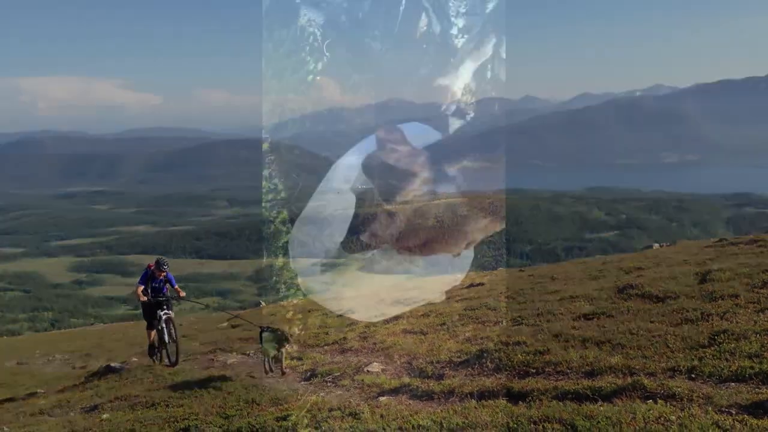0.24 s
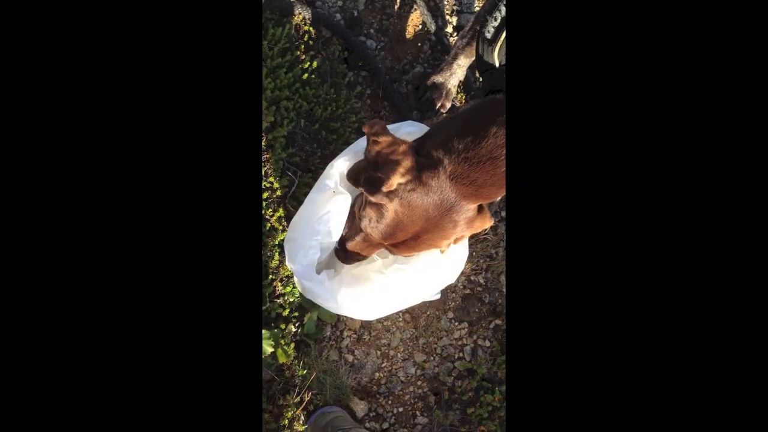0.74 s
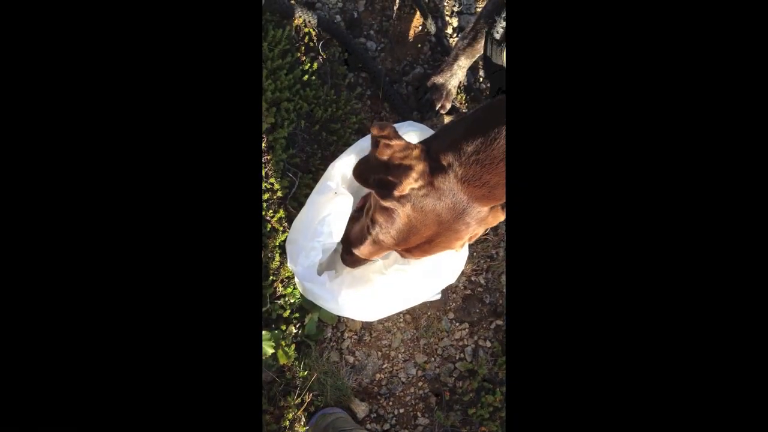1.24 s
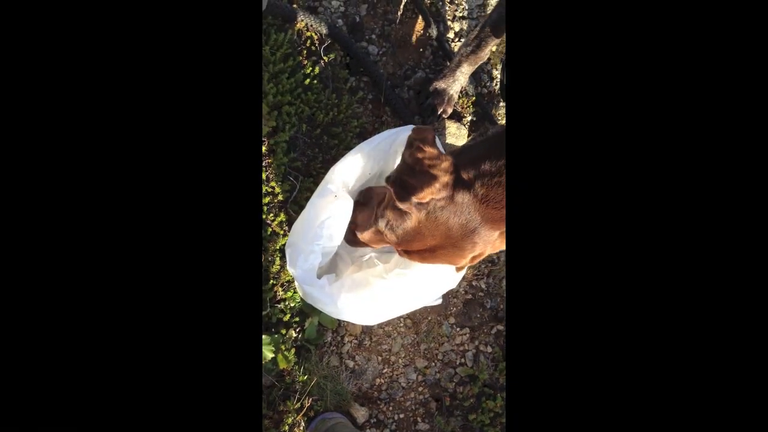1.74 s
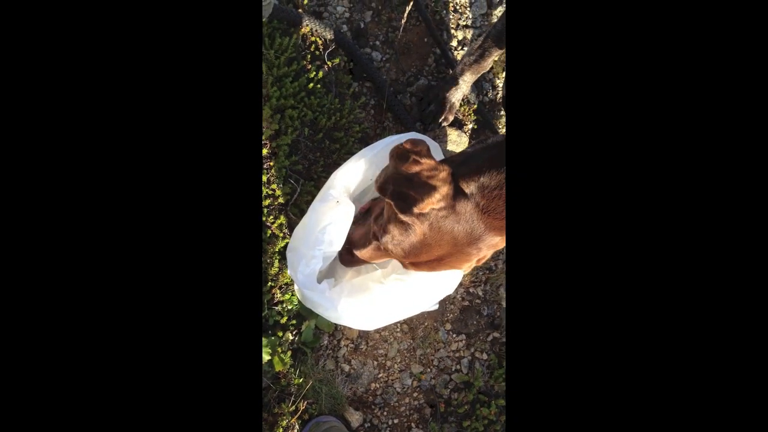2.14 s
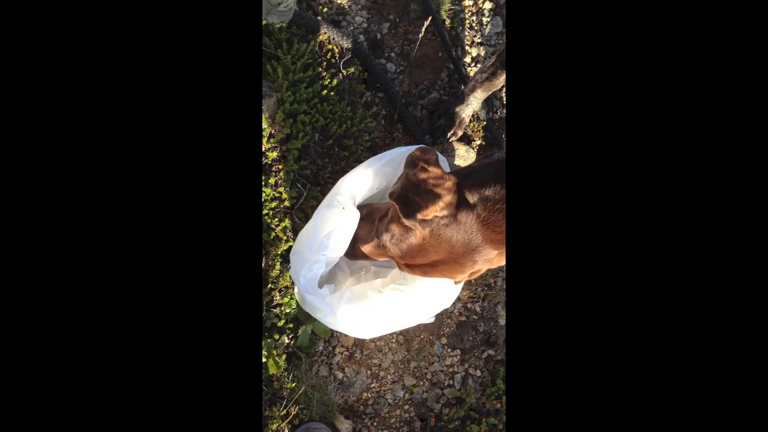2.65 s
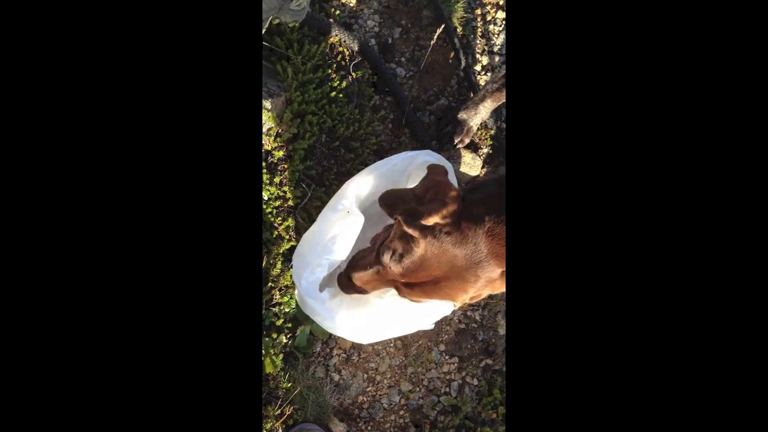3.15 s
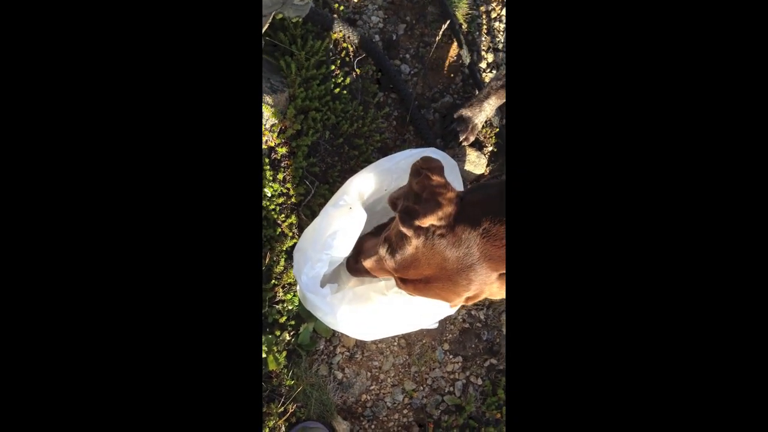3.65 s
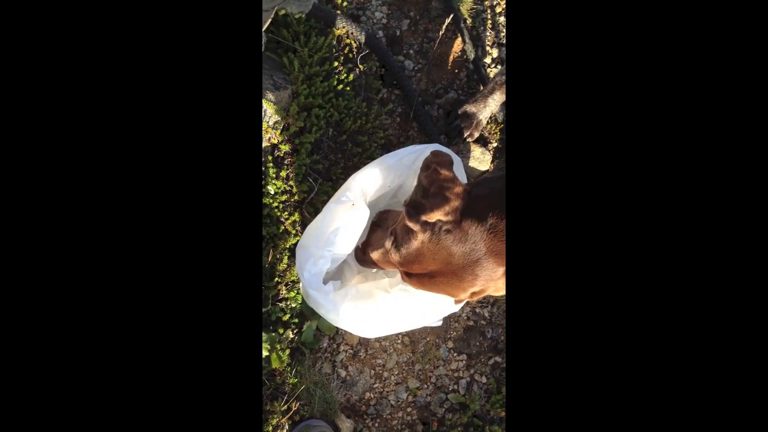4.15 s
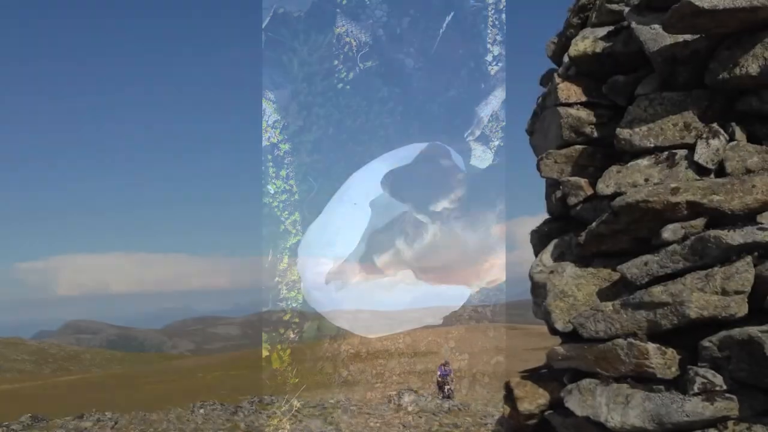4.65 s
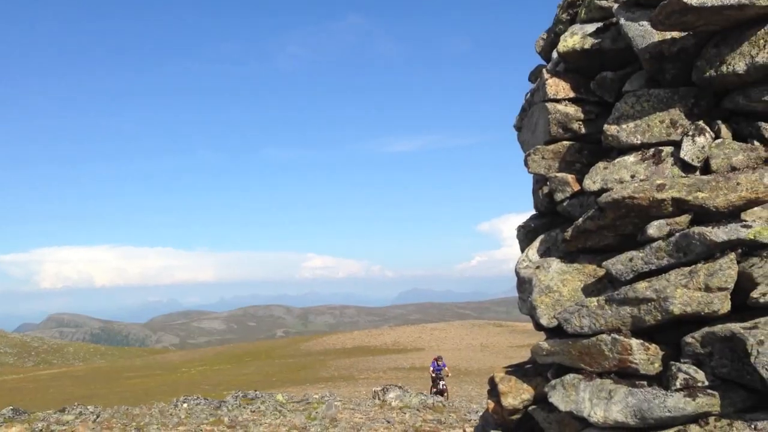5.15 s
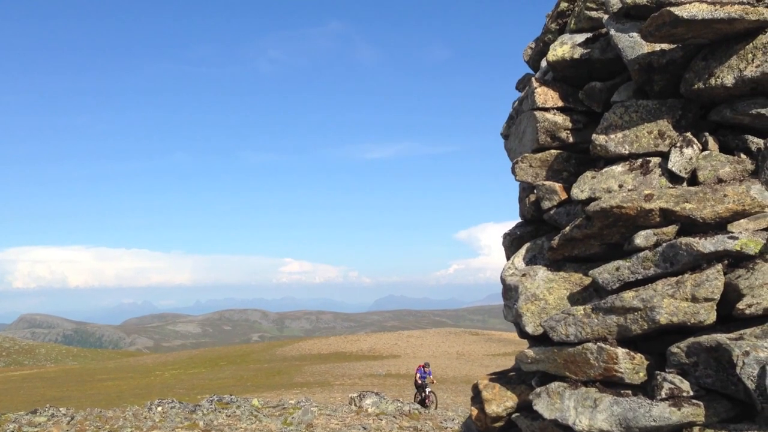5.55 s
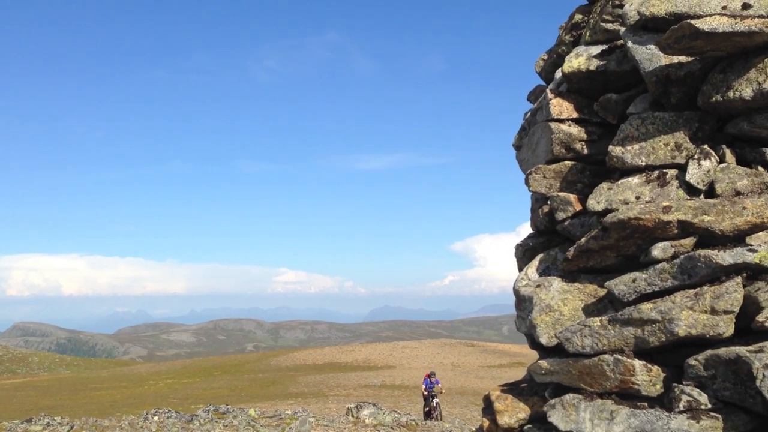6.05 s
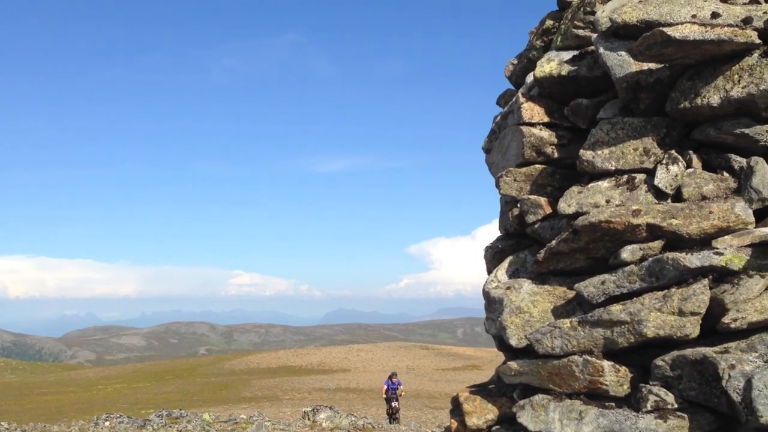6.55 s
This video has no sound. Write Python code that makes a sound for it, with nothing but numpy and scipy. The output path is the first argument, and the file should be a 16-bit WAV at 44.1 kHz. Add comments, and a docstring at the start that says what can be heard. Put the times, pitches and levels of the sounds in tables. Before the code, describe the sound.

Close, rhythmic slurps and splashes of a dog drinking outdoors fade out into quiet air and one small tick.

```python
"""Open ground, a small microphone close to a dog drinking from a plastic bag. Over a faint hiss, water
trickles and the lapping starts, about three laps a second. In each lap the tongue slaps the water and
pulls a column out, then the jaws snap shut with a plop: trapped air rings, water films tear, and
droplets splatter back. Stones and ground nearby return a brief scatter. Near five seconds the lapping
fades out, leaving the hiss, a few faint scuffs and one small tick."""
import sys
import numpy as np
from scipy import signal
from scipy.fft import rfft, irfft, next_fast_len
from scipy.io import wavfile

SR = 44100
rng = np.random.default_rng(int(sys.argv[2]) if len(sys.argv) > 2 else 0)


def store_wav(level_fs):
    """Save 16-bit WAV to argv[1]."""
    pcm = np.round(np.clip(np.atleast_2d(level_fs), -1, 1) * 32767)
    wavfile.write(sys.argv[1], SR, pcm.T.astype(np.int16))


N = 300497
TIME = np.arange(N) / SR
CUTOFF_HZ = 15600

# the hiss of the open air, its colour: f/Hz, density/dB; its course: t/s, level/dB
AIR_COLOUR = [(18, -47.5), (30, -20), (80, -13.5), (148, -5), (192, -2), (230, -7.5), (299, -7), (410, -7),
              (505, -9.5), (709, -14), (787, -13.5), (1110, -16.5), (1360, -18), (1680, -17.5),
              (4780, -13.5), (15500, -17)]
AIR_LEVEL = [(0, -68.5), (.5, -66.5), (4.3, -68), (4.65, -71.5), (5.0, -68), (6.8, -68.5)]
# the trickle between laps: t/s, level/dB
DRIBBLE_LEVEL = [(0.0, -65.5), (0.25, -68.5), (0.5, -66), (0.63, -62), (2.26, -62.5), (2.34, -65),
                 (2.69, -67.5), (2.78, -65.5), (3.27, -69), (3.35, -65), (4.22, -69), (4.34, -63.5),
                 (4.48, -71), (4.95, -78.5)]
# uneven swells of soft, bright rustle between laps, probably the bag: t/s, level/dB
RUSTLE_LEVEL = [(0, -80), (.55, -77), (.72, -68.5), (1.0, -70), (1.28, -75), (1.52, -64.5), (1.7, -68.5),
                (1.86, -69), (2.02, -60), (2.12, -68), (2.18, -78), (2.26, -66), (2.4, -68), (2.5, -85),
                (4.9, -87)]
# colours of large, middling and fine bubbles, of foam and of stray pings: f/Hz, density/dB
SLOSH_COLOUR = [(130, -21), (200, -6.5), (310, -4.5), (450, 2.5), (620, -5), (900, -2), (1250, -16.5),
                (1800, -38)]
TRICKLE_COLOUR = [(800, -19), (1250, -4), (1700, 0), (2200, 0.5), (2900, -7.5), (3800, -33.5)]
SPRAY_COLOUR = [(2300, -21.5), (3200, -1.5), (4000, 4.5), (4900, -1.5), (6000, -6), (7500, -11),
                (10000, -13.5), (15000, -15)]
FOAM_COLOUR = [(5400, -5.5), (6400, -4.5), (7500, 0), (8700, -5), (10000, -9.5), (11500, -14.5),
               (15000, -16)]
PING_COLOUR = [(3400, 0), (5200, -3)]
# the splash around each beat, and the swish of the wet tongue through a whole lap:
# rise/s, hold/s, fall/s, slosh/dB, trickle/dB, spray/dB, foam/dB
SLAP_SPLASH = (.019, 0.0143, .023, -48.5, -54, -55.5, -70)
PULL_SPLASH = (.013, 0.0127, .022, -48.5, -64.5, -53.5, -63.5)
SNAP_SPLASH = (.005, 0.0175, .017, -52, -67, -57, -79)
TONGUE_SWISH = (.016, 0.13, .018, -59, -65, -61.5, -68)
# first beat, the tongue slaps the water and traps an air pocket: t/s, pocket f/Hz, pocket/dB,
# pocket t60/s, smack/dB, treble/dB, thud/dB, first touch lead/s, touch/dB re slap, slosh/dB, spray/dB
SLAPS = [(0.2961, 600, -36.5, 0.0076, -50, -56, -59, .011, -2.5, -13, -2),
         (0.4755, 600, -36, .012, -38, -54, -57, .012, -3.5, -2.5, -0.5),
         (0.8056, 477, -19.5, 0.041, -20, -34.5, -42, .011, -13.5, 2.5, 0),
         (1.0765, 417, -18, 0.019, -19.5, -35, -25.5, .01, -21, 4.5, 4),
         (1.3741, 450, -20.5, 0.021, -22.5, -42.5, -34, .01, -20, -3, -1.5),
         (1.7261, 453, -15, .016, -24.5, -41.5, -31, .009, -20, -7, -1.5),
         (2.0263, 570, -34, .018, -45, -59, -55, .02, -9, 2.5, 0),
         (2.2772, 575, -38, .035, -44, -61, -58, .01, -20, -5, -3.5),
         (2.6495, 515, -22, 0.025, -41.5, -45.5, -46, .009, -11.5, -4.5, 1),
         (2.907, 810, -28.5, .011, -36.5, -47, -54, .01, -19, -1.5, 1),
         (3.2024, 474, -19, 0.014, -25.5, -37, -43, .008, -6, 0.5, 2.5),
         (3.4877, 564, -34.5, 0.055, -39, -56, -37, .01, -5, 3, 0.5),
         (3.8383, 577, -36.5, 0.052, -43.5, -58, -43.5, .01, -20, -6.5, -4),
         (4.1325, 587, -20.5, 0.03, -30, -55, -56, .013, -4, 2.5, -1),
         (4.4294, 503, -20, .018, -27, -41, -39, .007, -1.5, -1.5, -0.5),
         (4.7834, 524, -35.5, .015, -52, -60, -58, .01, -14, -11, -9.5)]
# second beat, about 75 ms on, the tongue pulls out and its water column collapses:
# t/s, pocket f/Hz, pocket/dB, ping/dB, smack/dB, treble/dB, thud/dB, slosh/dB, spray/dB
PULLS = [(0.5415, 756, -35, -46, -52, -51, -40.5, -2, 0), (0.8745, 633, -33.5, -33.5, -50, -45, -38, 1, -2),
         (1.158, 567, -27.5, -46, -48, -52, -50, -1.5, -5), (1.4442, 684, -30, -34, -45, -46, -45, 0, -2),
         (1.797, 350, -20, -43, -51, -43, -26, -2, -2), (2.0836, 540, -42, -40, -46, -52, -49, 1.5, 1),
         (2.354, 360, -28, -43, -43, -44.5, -47, 0.5, 1),
         (2.7295, 480, -31.5, -33.5, -38.5, -47, -50, 1.5, 2), (2.981, 610, -38, -29, -41, -44, -42, 0, -2),
         (3.266, 405, -19.5, -42, -48, -48, -39, -1, -5), (3.559, 820, -34.5, -44, -44, -39, -58, -3, -4),
         (3.9165, 620, -31.5, -40.5, -53, -38.5, -54, -3, -3),
         (4.1995, 668, -33, -39, -50, -41, -37, -1.5, 0),
         (4.5053, 764, -30, -42.5, -54, -52, -48, 1.5, 0.5),
         (4.8005, 450, -50, -52, -40.5, -44, -52, -10, -12)]
# third beat, about 40 ms on, the jaws snap shut: t/s, f/Hz, plop/dB, smack/dB, treble/dB, splash/dB
JAW_SNAPS = [(0.5845, 754, -38, -51, -56, -3), (0.918, 914, -19.5, -36, -51, 2),
             (1.1901, 1040, -31.5, -32, -37, 1), (1.4855, 855, -37.5, -41, -45, 3.5),
             (1.843, 946, -23.5, -39, -52, -1), (2.1199, 824, -28.5, -52, -62, -3),
             (2.4106, 800, -36.5, -49, -58, -2.5), (3.0351, 818, -24.5, -48.5, -60, 0.5),
             (3.3062, 1030, -26, -35, -44, 5.5), (3.6057, 763, -28.5, -46, -43.5, -1.5),
             (3.9627, 840, -23, -43, -60, 2), (4.2439, 873, -23.5, -36, -44, 0),
             (4.9007, 917, -33.5, -57, -66, -15)]
# single drops from muzzle and tongue, and further small bubbles shed by a pulled column or its falling foot:
# t/s, f/Hz, level/dB, t60/s
SMALL_BUBBLES = [(0.5237, 3870, -42.5, .011), (0.8204, 550, -30, 0.052), (0.8878, 228, -33, 0.037),
                 (1.0144, 985, -25, .0054), (1.2812, 4740, -41.5, .008), (1.3109, 4380, -45, .014),
                 (1.709, 3900, -39, .015), (1.7839, 4420, -34, .015), (1.7964, 790, -23, 0.02),
                 (2.0704, 3940, -34.5, .013), (2.2175, 2000, -37, 0.0064), (2.228, 5200, -44.5, 0.016),
                 (2.3824, 3980, -39, .036), (2.385, 435, -29, .007), (2.4103, 2730, -46, .018),
                 (2.4784, 1100, -50, .018), (2.5693, 3970, -46.5, .015), (2.715, 467, -31.5, 0.014),
                 (2.8387, 5220, -41, .023), (2.8404, 2090, -27, .012), (3.1752, 4400, -37, .004),
                 (3.2861, 765, -26.5, .007), (3.3157, 674, -29, .011), (3.4124, 2060, -41.5, .012),
                 (3.4156, 5130, -42, .01), (3.5797, 5000, -34, .007), (3.6207, 4720, -34.5, 0.025),
                 (3.6704, 1200, -43, 0.032), (3.6788, 390, -44, .038), (3.8555, 398, -29.5, .009),
                 (3.9279, 550, -28.5, 0.011), (4.1725, 1530, -38.5, .019), (4.3382, 4430, -44, .015),
                 (4.5412, 350, -35.5, .013), (4.6075, 1130, -48.5, .022), (4.7296, 1840, -46.5, .02),
                 (4.876, 4180, -47, .018)]
# resonances of the hollow of bag and muzzle: f/Hz, width/Hz, gain/dB
HOLLOW_MODES = [(450, 160, 5.5), (1052, 127, 6), (1487, 320, 1.5), (2000, 272, 6.5), (2600, 720, -3),
                (3400, 1100, -6), (5200, 390, -4)]
# faint scuffs and bumps: t/s, f/Hz, width/Hz, level/dB, half-length/s
SCUFFS = [(4.798, 135, 60, -55, 0.027), (5.433, 195, 60, -66, 0.02), (5.974, 272, 220, -67, 0.013),
          (6.382, 1190, 1400, -75, .02), (6.71, 1480, 1403, -66, 0.011)]
# the dry tick after the drink: t/s, level/dB; its ring: f/Hz, gain/dB, t60/s
TICKS = [(5.33, -35.5)]
TICK_MODES = [(192, -30, 0.037), (407, -8, 0.012), (935, -1, 0.013), (2375, -4, 0.0058), (3330, -5, 0.0028)]


def from_db(db):
    """Decibels to gain."""
    return 10 ** (np.asarray(db) / 20)


def rms_one(x):
    """Scale to an rms of one."""
    return x / np.sqrt(np.mean(x ** 2) + 1e-20)


def fader(curve):
    """Gain at every sample, from rows of t/s, level/dB."""
    return from_db(np.interp(TIME, *np.transpose(curve)))


def add(out, s, sound):
    """Mix a sound in at s seconds."""
    i = max(int(s * SR), 0)
    out[i:i + len(sound)] += sound[:N - i]


def band(x, low_hz, high_hz):
    """Butterworth band-pass."""
    return signal.sosfilt(signal.butter(2, [low_hz, high_hz], "band", fs=SR, output="sos"), x + 1e-18)


def low_cut(x, hz):
    """Butterworth high-pass."""
    return signal.sosfilt(signal.butter(2, hz, "high", fs=SR, output="sos"), x)


def wobble(size, rate_hz):
    """Smooth random motion; rms one."""
    smoothing = signal.butter(2, rate_hz, fs=SR, output="sos")
    return rms_one(signal.sosfilt(smoothing, rng.standard_normal(size)))


def gain_at(colour, hz):
    """Gain of a colour at given frequencies."""
    points, db = np.transpose(colour)
    return from_db(np.interp(np.log(hz + 1), np.log(points), db))


def noise(colour):
    """Noise that falls away beyond the ends of its colour; rms one."""
    size = next_fast_len(N)
    hz = np.arange(size // 2 + 1) * SR / size
    skirts = np.minimum(hz / colour[0][0], 1) ** 2 * np.minimum(colour[-1][0] / (hz + 1), 1) ** 2
    white = rfft(rng.standard_normal(size))
    return rms_one(irfft(white * gain_at(colour, hz) * skirts, size)[:N])


def air():
    """The bed of the place: a faint, nearly steady hiss."""
    return fader(AIR_LEVEL) * noise(AIR_COLOUR)


def dribble(lull_after_s=.068, lull_s=.132, lull_db=-9):
    """Strength of the trickle between laps; it dips while the jaws are shut and ends with the drink."""
    lull = np.zeros(N)
    for s, *_ in JAW_SNAPS:
        add(lull, s + lull_after_s - lull_s / 2, np.hanning(int(lull_s * SR)))
    ending = np.interp(TIME, [4.85, 4.97], [1, 0])
    return fader(DRIBBLE_LEVEL) * from_db(lull_db * lull) * ending


def droplets(colour, per_s, cycles, spread_db, rise=.054, pitches=400):
    """Tiny bubbles of random size and pitch ring for some cycles and chirp upward; rms one."""
    when, chance, pitch, size = rng.random((24000, 4)).T
    born = chance < per_s * TIME[-1] / len(chance)
    low_hz, high_hz = colour[0][0], min(colour[-1][0], CUTOFF_HZ)
    hz = np.geomspace(low_hz, high_hz, pitches)[:, None]
    t = TIME[:int(np.clip(cycles * SR / np.sqrt(low_hz * high_hz), 50, 1200))]
    age = t * hz / cycles   # one when the bubble is 60 dB down
    envelope = (1 - np.exp(-t * hz)) * from_db(-60 * age)
    turns = hz * t * (1 + rise * np.minimum(age, 1)) + rng.random((pitches, 1))
    # high bubbles die sooner and lie further apart in pitch, so they need more height
    rings = hz * gain_at(colour, hz) * envelope * np.sin(2 * np.pi * turns)
    heights = from_db(spread_db * np.minimum(-np.log(1 - size[born]), 3))
    starts, kinds = (when[born] * N).astype(int), (pitch[born] * pitches).astype(int)
    out = np.zeros(N + len(t))
    for i, kind, height in zip(starts, kinds, heights):
        out[i:i + len(t)] += height * rings[kind]
    return rms_one(out[:N])


def churn(colour, per_s, cycles, spread_db, wash_db):
    """Distinct droplets over the smooth wash of countless smaller ones; rms one."""
    return rms_one(droplets(colour, per_s, cycles, spread_db) + from_db(wash_db) * noise(colour))


def splash(shape, beats):
    """Power of slosh, trickle, spray and foam as each beat (t/s, ..., slosh/dB, spray/dB) swells and dies."""
    rise_s, hold_s, fall_s, *layers_db = shape
    power, t = np.zeros((4, N)), TIME[:SR // 2] - .15
    swell = np.exp(np.minimum(t, 0) / rise_s - np.maximum(t - hold_s, 0) / fall_s)
    for s, *_, slosh_db, spray_db in beats:
        trims_db = (slosh_db, (slosh_db + spray_db) / 2, spray_db, spray_db)
        for layer, base_db, trim_db in zip(power, layers_db, trims_db):
            add(layer, s + t[0], (from_db(base_db + trim_db) * swell) ** 2)
    return power


def splatter(ping_db=-10, clump_db=1.5, clump_hz=45):
    """Water falls back in clumps of bubbles, foam and stray pings; a soft rustle swells between laps."""
    power = (splash(SLAP_SPLASH, SLAPS)
             + splash(TONGUE_SWISH, SLAPS[1:-1])   # the first and last are mere licks
             + splash(PULL_SPLASH, PULLS)
             + splash(SNAP_SPLASH, [(s, db, db) for s, *_, db in JAW_SNAPS]))
    # one gain each for slosh, trickle, spray and foam
    between = np.outer(from_db([-2.5, -1, -7, -np.inf]), dribble())
    rustle = np.outer(from_db([-3, 1.5, 0, -1.5]), fader(RUSTLE_LEVEL))
    clumps = np.array([rms_one(from_db(clump_db * wobble(N, clump_hz))) for _ in power])
    slosh, trickle, spray, foam = clumps * np.sqrt(power + between ** 2 + rustle ** 2)
    pings = from_db(ping_db) * droplets(PING_COLOUR, per_s=70, cycles=55, spread_db=3)
    return (slosh * churn(SLOSH_COLOUR, per_s=450, cycles=15.5, spread_db=4, wash_db=-11)
            + trickle * churn(TRICKLE_COLOUR, per_s=900, cycles=35, spread_db=4.5, wash_db=-3.5)
            + spray * (churn(SPRAY_COLOUR, per_s=1500, cycles=45, spread_db=6, wash_db=-5.5) + pings)
            + foam * churn(FOAM_COLOUR, per_s=1500, cycles=14, spread_db=5, wash_db=-2))


def air_pockets():
    """All the air that drips, tongue and jaws set ringing: t/s, f/Hz, level/dB, t60/s."""
    rows = list(SMALL_BUBBLES)
    for s, hz, db, t60, _, _, _, early_s, touch_db, _, _ in SLAPS:
        rows += [(s - early_s, hz * 1.15, db + touch_db, t60),   # the first touch traps a smaller pocket
                 (s, hz, db, t60),
                 (s + .013, hz * 1.14, db - 17.5, .042)]   # what is left of the pocket rings on
    for s, hz, db, ping_db, *_ in PULLS:
        rows += [(s, hz, db, .016),
                 (s, 4037 * rng.uniform(.94, 1.05), ping_db, .019),   # the column sheds a tiny bubble
                 (s + .017, 480 * rng.uniform(.85, 1.16), db - 8.5, .0093)]   # its foot drops back
    return rows + [(s, hz, db, .016) for s, hz, db, *_ in JAW_SNAPS]


def plops(swell_s=.0021, rise=.044, glide_s=.0092, lead_db=-20, lead_s=.00495,
          thump_db=-18, thump_t60=.032, shake=.086):
    """An air pocket stirs, pinches off and rings, rising in pitch as it surfaces; it nudges the bag."""
    rings, nudges = np.zeros(N), np.zeros(N)
    t = TIME[:SR // 10] - .02
    since = np.maximum(t, 0)
    swell = np.sin(np.pi / 2 * np.minimum(since / swell_s, 1)) ** 2
    lead = from_db(lead_db) * np.exp(np.minimum(t, 0) / lead_s) * (1 - swell)
    for s, hz, db, t60 in air_pockets():
        decay = from_db(-60 * np.maximum(t - swell_s, 0) / t60)
        # the churning water shakes the smallest bubbles most
        shaken = shake * min(hz / 4000, 1) * wobble(len(t), rate_hz=550)
        pitch = hz * (1 + rise * (np.tanh(since / glide_s) - .5) + shaken)
        turns = np.cumsum(pitch) / SR
        turns -= np.interp(0, t, turns)   # the ring starts from rest at the pinch-off
        add(rings, s + t[0], from_db(db) * (lead + swell * decay) * np.sin(2 * np.pi * turns))
        nudge = swell * from_db(-60 * since / thump_t60) * wobble(len(t), rate_hz=900)
        add(nudges, s + t[0], from_db(db) * min(1, 700 / hz) * nudge)
    return rings + from_db(thump_db) * band(nudges, 175, 700)


def water_films(drip_s=.002, slap_s=.0036, pull_s=.0029, snap_s=.0031):
    """All the water films that tear: t/s, smack/dB, treble/dB, thud/dB, base decay/s."""
    rows = [(s, db - 15.5, db - 29, -np.inf, drip_s) for s, _, db, _ in SMALL_BUBBLES]
    for s, _, _, _, smack, treble, thud, early_s, touch_db, _, _ in SLAPS:
        rows += [(s - early_s, smack + touch_db, treble + touch_db, thud + touch_db, slap_s),
                 (s, smack, treble, thud, slap_s)]
    for s, *_, spray_db in SLAPS:   # two stray drops tick on the bag after each slap
        delays_s = .14 * rng.random(2)
        levels_db = spray_db - 50 + rng.normal(0, 3.3, 2)
        rows += [(s + late_s, db, db, -np.inf, drip_s) for late_s, db in zip(delays_s, levels_db)]
    rows += [(s, smack, treble, thud, pull_s) for s, _, _, _, smack, treble, thud, _, _ in PULLS]
    # the jaws barely shake the bag, so their thud is weak
    return rows + [(s, smack, treble, smack - 12.5, snap_s) for s, _, _, smack, treble, _ in JAW_SNAPS]


def tearing(films, levels_db, lead_db, lead_s, tail_db, tail_s, stretch, rise_s=.00029):
    """Strength of the smacks in time: a film squelches as it stretches, tears, then patters down."""
    power, t = np.zeros(N), TIME[:SR // 8] - .03
    before, after = np.minimum(t, 0), np.maximum(t, 0)
    squelch = from_db(lead_db) * np.exp(before / lead_s) * (t < 0)
    patter = from_db(tail_db) * np.exp(-after / tail_s) * (t >= 0)
    for (s, *_, decay_s), db in zip(films, levels_db):
        tear = np.exp(before / rise_s - after / (decay_s * stretch))
        add(power, s + t[0], (from_db(db) * (squelch + tear + patter)) ** 2)
    return np.sqrt(power)


def crackle(share=.3):
    """Dense random clicks; rms one."""
    return rms_one(rng.standard_normal(N) * (rng.random(N) < share))


def resonance(x, hz, width_hz):
    """Two-pole resonance with a peak gain of one."""
    r = np.exp(-np.pi * width_hz / SR)
    feedback = [1, -2 * r * np.cos(2 * np.pi * hz / SR), r * r]
    return signal.lfilter(np.array([1, 0, -1]) * (1 - r * r) / 2, feedback, x + 1e-18)


def smacks(hollow_db=3, foam_db=-5, bag_db=17, crisp_db=11.5, crisp_share=.504):
    """Each tearing film rings the hollow, bursts a foam of tiny bubbles and thuds on the slack bag."""
    films = water_films()
    _, smack_db, treble_db, thud_db, _ = np.transpose(films)
    tear = tearing(films, smack_db, lead_db=-12.5, lead_s=.0057, tail_db=-13, tail_s=.011, stretch=.99)
    tear *= crackle()
    # only a crisp smack reaches the upper resonances in full
    upper_db = smack_db + crisp_share * (treble_db + crisp_db - smack_db)
    crisp = tearing(films, upper_db, lead_db=-11, lead_s=.0068, tail_db=-12.5, tail_s=.015, stretch=.96)
    crisp *= crackle()
    hollow = sum((-1) ** k * from_db(db) * resonance(tear if hz < 3000 else crisp, hz, width_hz)
                 for k, (hz, width_hz, db) in enumerate(HOLLOW_MODES))
    foam = tearing(films, treble_db, lead_db=-15.5, lead_s=.0046, tail_db=-15, tail_s=.037, stretch=.87)
    foam *= droplets(FOAM_COLOUR, per_s=2600, cycles=48, spread_db=1.5)
    thud = tearing(films, thud_db, lead_db=-13, lead_s=.0071, tail_db=-28, tail_s=.018, stretch=1.3)
    bag = band(thud * crackle(), 235, 390)
    return from_db(hollow_db) * hollow + from_db(foam_db) * foam + from_db(bag_db) * bag


def ground_scatter(direct, wet_db=-24, decay_s=.00595, gap_s=.003):
    """The direct sound, then a brief, dull scatter off stones and ground close by."""
    t = TIME[:SR // 6]
    echoes = band(rng.standard_normal(len(t)), 150, 5000) * np.exp(-t / decay_s) * (t > gap_s)
    echoes /= np.sqrt(np.sum(echoes ** 2))
    return direct + from_db(wet_db) * signal.fftconvolve(direct, echoes)[:N]


def scuffs():
    """Faint scuffs and bumps: each a band of noise that swells and fades in a moment."""
    out = np.zeros(N)
    for s, hz, width_hz, db, half_s in SCUFFS:
        rub = rms_one(band(rng.standard_normal(N), hz - width_hz / 2, hz + width_hz / 2))
        out += from_db(db) * rub * np.exp(-((TIME - s) / half_s) ** 2)
    return out


def ring(clicks, hz, t60):
    """A unit click sets a sine of height one ringing."""
    r, w = from_db(-60 / (t60 * SR)), 2 * np.pi * hz / SR
    return signal.lfilter([0, np.sin(w)], [1, -2 * r * np.cos(w), r * r], clicks + 1e-18)


def tick(crack_db=12):
    """A dry click with a short dull ring."""
    click = np.zeros(N)
    for s, db in TICKS:
        add(click, s, from_db([db]))
    crack = from_db(crack_db) * band(click, 530, 7600)
    return crack + sum(from_db(db) * ring(click, hz, t60) for hz, db, t60 in TICK_MODES)


def scene(radiation_hz=135):
    """The drinking dog close up on open ground, in mono; a small pool radiates little bass."""
    water = low_cut(plops() + smacks() + splatter(), radiation_hz)
    return (air() + ground_scatter(water) + scuffs() + tick())[None]


def record(dry, bass_cut_hz=110):
    """A small microphone thins the bass; the top is cut steeply."""
    top_cut = signal.ellip(10, .1, 70, CUTOFF_HZ, fs=SR, output="sos")
    return signal.sosfilt(top_cut, low_cut(dry, bass_cut_hz))


dry = scene()
out = record(dry)
store_wav(out)
```